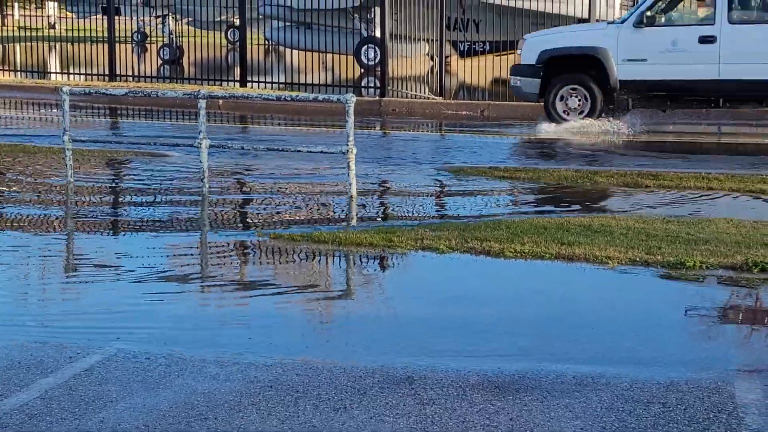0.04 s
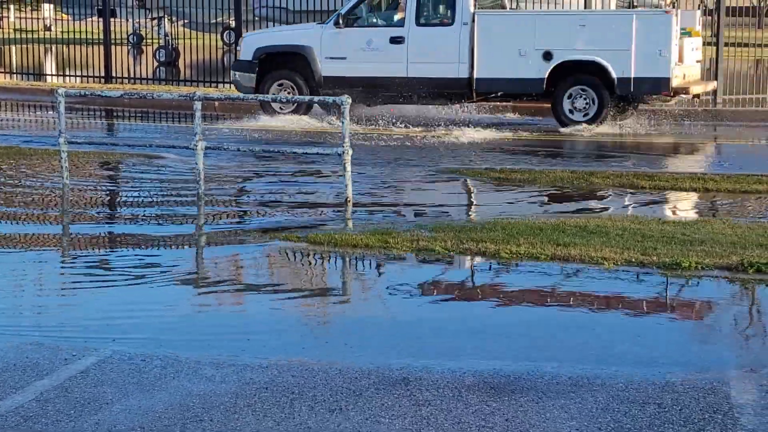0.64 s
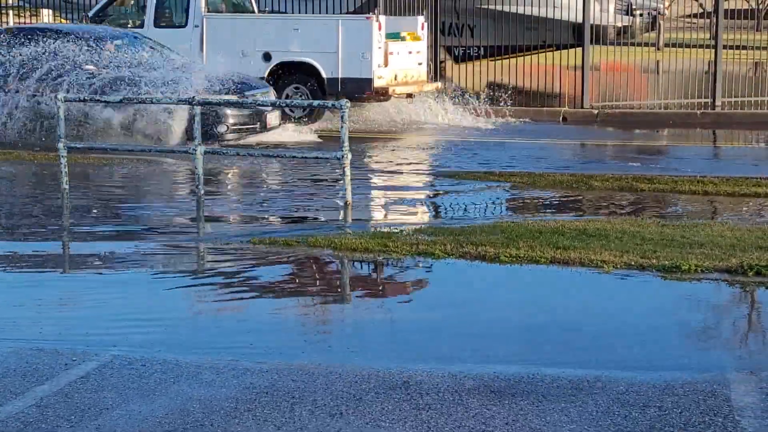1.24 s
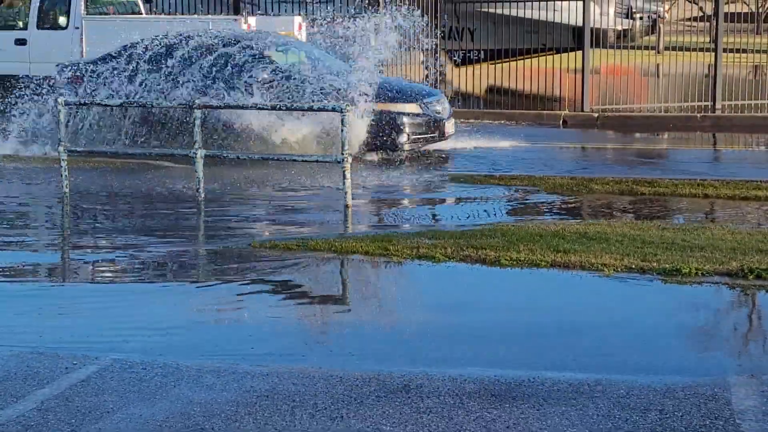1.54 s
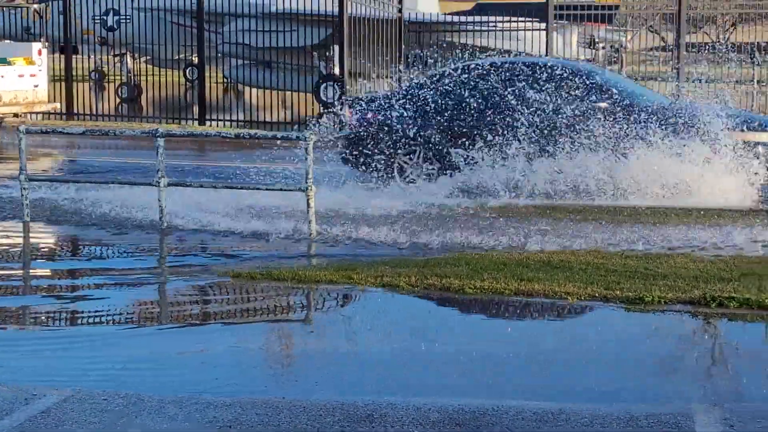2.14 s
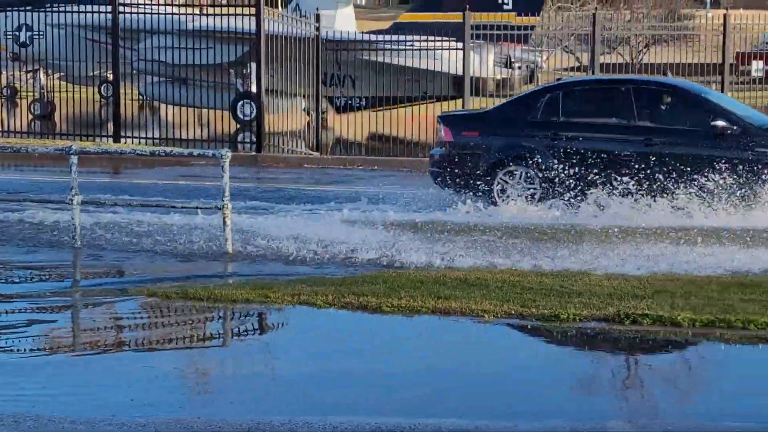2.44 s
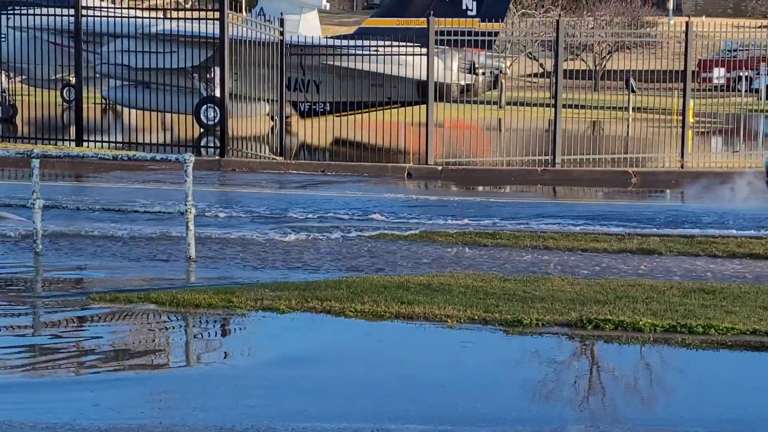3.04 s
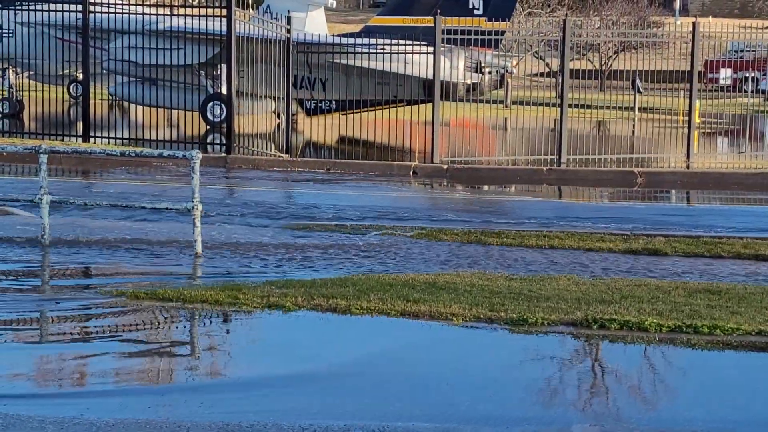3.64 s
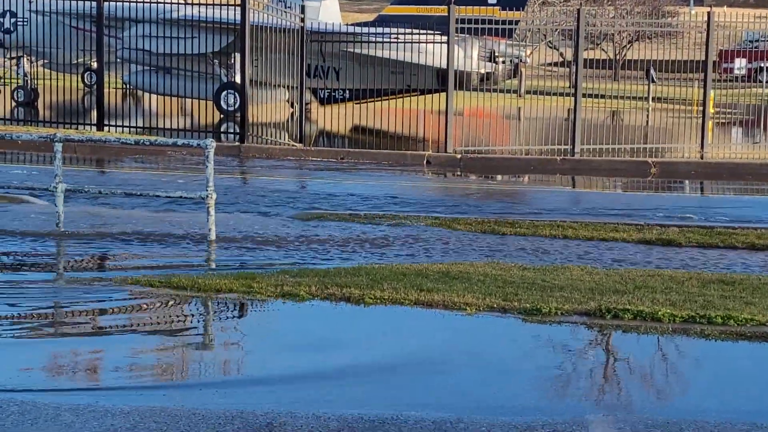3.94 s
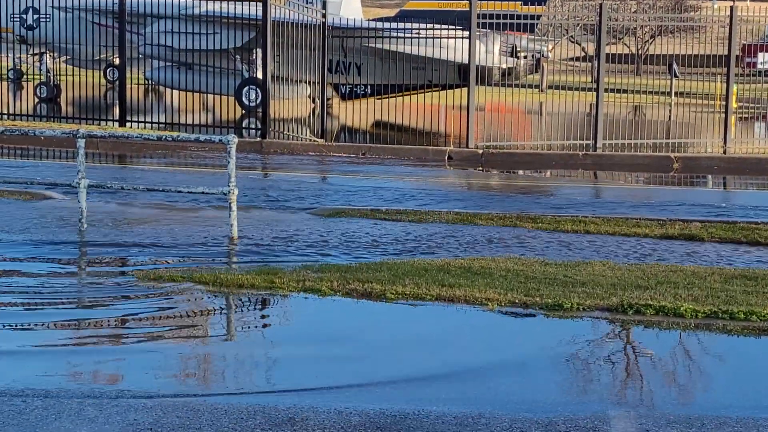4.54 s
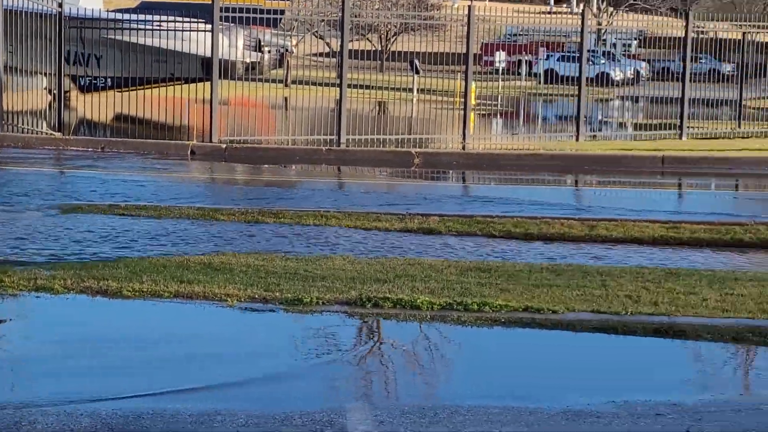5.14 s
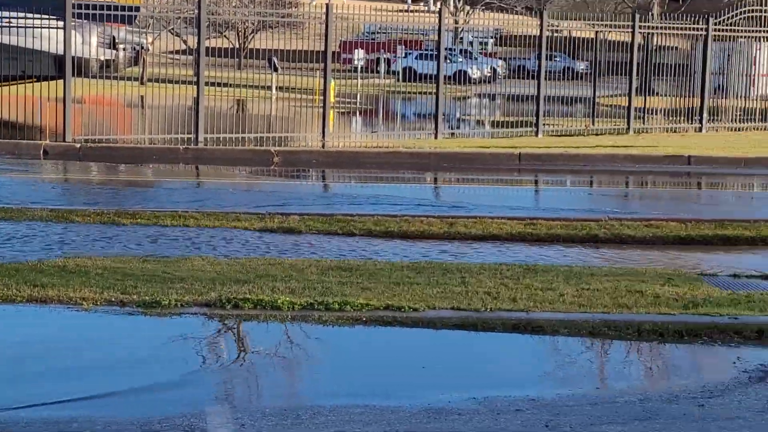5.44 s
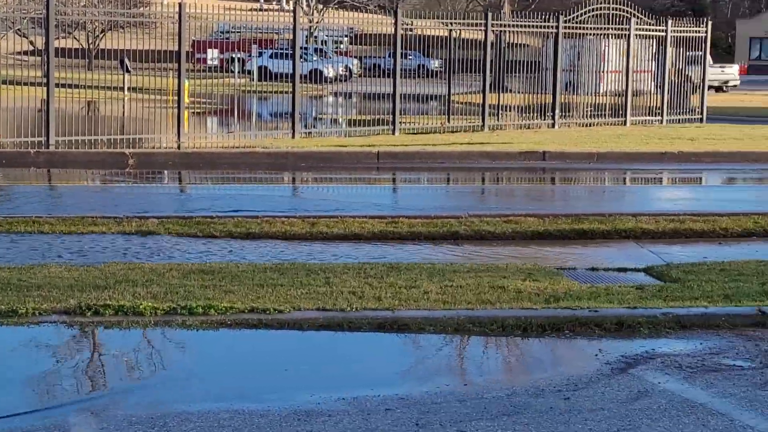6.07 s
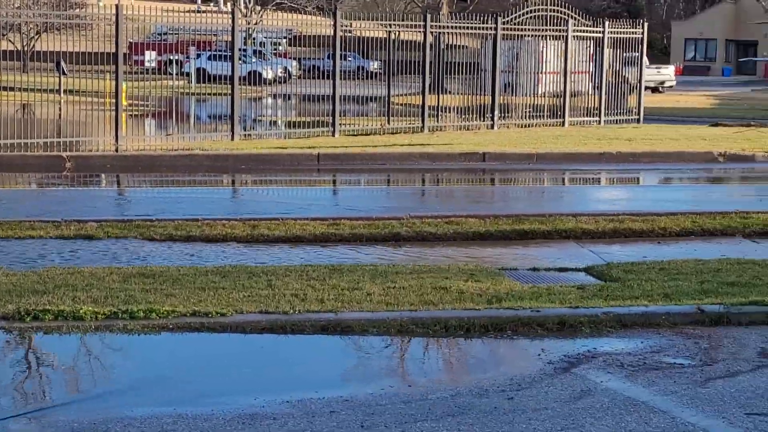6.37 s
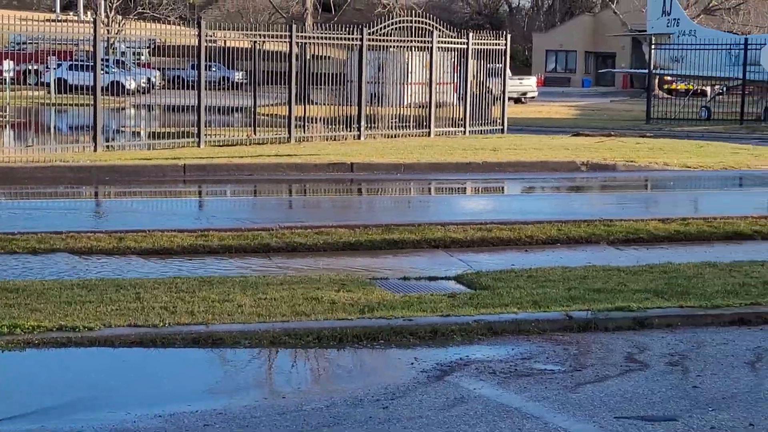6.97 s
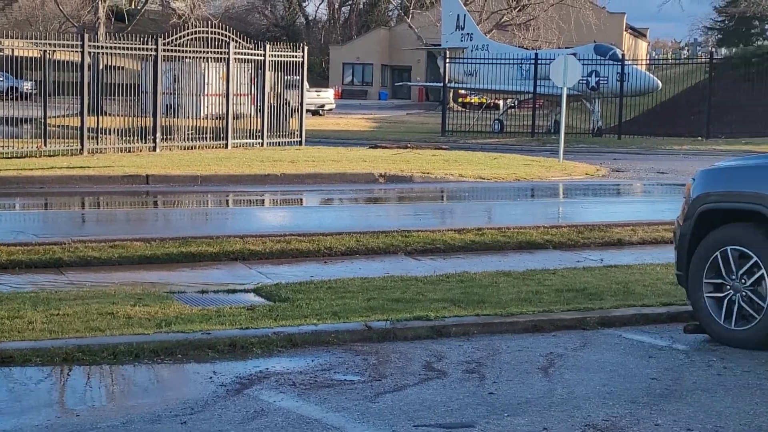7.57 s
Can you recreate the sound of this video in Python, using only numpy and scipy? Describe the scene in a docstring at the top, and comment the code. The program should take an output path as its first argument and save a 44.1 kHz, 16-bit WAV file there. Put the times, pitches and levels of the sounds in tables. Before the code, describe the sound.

A pickup's exhaust drones steadily as its tyres churn and hiss through a flooded street a few metres off. The splashing swells when a car ploughs through too, throwing spray that patters back down. Around halfway the engine note winds down, with a brief thin squeal from wet wheels. What remains is quieter open air: gently gurgling water, low puffs of far traffic and a few thin bird chirps.

```python
"""Driving through floodwater

A pickup and a car plough through standing water some metres away. The pickup's exhaust pulses drone
and wind down; tyres churn the flood and hiss, bow waves break, spray swells and rains back, and the
car's wet wheels squeal thinly. Then the wake bubbles on, distant traffic rumbles in uneven puffs
and a small bird whistles."""
import sys
import numpy as np
from scipy import signal
from scipy.fft import rfft, irfft, next_fast_len
from scipy.io import wavfile

SR = 44100
rng = np.random.default_rng(int(sys.argv[2]) if len(sys.argv) > 2 else 0)


def put_to_file(sound):
    """Save the sound as 16-bit audio at rate SR, in the file named by the first command-line argument."""
    columns = np.atleast_2d(sound).T  # one column per channel
    safe = np.clip(columns, -1, 1)
    whole_steps = np.round(safe * 32767)
    wavfile.write(sys.argv[1], SR, whole_steps.astype(np.int16))


N = 344224
TIME = np.arange(N) / SR  # seconds
BIN_HZ = np.maximum(np.fft.rfftfreq(N, 1 / SR), 1)


def undb(db):
    """Decibels to gain."""
    return 10 ** (np.asarray(db) / 20)


def unit(x):
    """Scale to rms 1."""
    return x / np.sqrt(np.mean(x ** 2))


def curves(table):
    """One curve per column after the first, joined by straight lines in time."""
    times_s, *columns = np.transpose(table)
    return [np.interp(TIME, times_s, column) for column in columns]


def swell(from_s, until_s, rise_db_per_s, fall_db_per_s):
    """Attack, hold and release, in dB relative to the held level."""
    return -rise_db_per_s * np.maximum(from_s - TIME, 0) - fall_db_per_s * np.maximum(TIME - until_s, 0)


def bump(at_s, half_s):
    """A bell-shaped rise from 0 to 1 and back."""
    return np.exp(-((TIME - at_s) / half_s) ** 2)


def turns(hz):
    """Running phase of a frequency curve, in radians."""
    return 2 * np.pi * np.cumsum(hz) / SR


def across(points):
    """Join (freq_hz, value) points on a log-frequency axis."""
    hz, value = np.transpose(points)
    return np.interp(np.log(BIN_HZ), np.log(hz), value)


def colour(points):
    """EQ gain through (freq_hz, gain_db) points, falling steeply beyond both ends."""
    skirts = np.minimum(BIN_HZ / points[0][0], 1) * np.minimum(points[-1][0] / BIN_HZ, 1)
    return undb(across(points)) * skirts ** 6


def walk(rate_hz):
    """Smooth random wander of spread 1, changing about rate_hz times a second."""
    size = next_fast_len(N)
    hz = np.fft.rfftfreq(size, 1 / SR)
    smoothing = np.exp(-(hz / rate_hz) ** 2 / 2)
    return unit(irfft(rfft(rng.standard_normal(size)) * smoothing, size)[:N])


def noise():
    """Three unrelated white noises: common, left, right."""
    return rng.standard_normal((3, N))


def wet_noise(drops_per_s, spread_db, drop_gain):
    """Three-part noise peppered with droplet impacts: many small, a few large."""
    parts = noise()
    for part in parts:
        size = undb(spread_db * np.minimum(rng.exponential(size=N), 5))
        hits = rng.random(N) < drops_per_s / SR
        part += drop_gain * unit(hits * size * rng.standard_normal(N))
    return parts


def band(hz, width_hz):
    """Three-part noise ringing in one moving resonance."""
    count = int(8 * width_hz * N / SR)
    offset_hz = np.fft.fftfreq(count, N / SR / count)
    phases = 2 * np.pi * rng.random((count, 3)).T
    envelopes = np.fft.ifft(np.exp(1j * phases - (offset_hz / width_hz) ** 2 / 2))
    coarse_s = np.linspace(0, N / SR, count)
    carrier = np.exp(1j * turns(hz))
    return np.array([unit(np.real(np.interp(TIME, coarse_s, env) * carrier)) for env in envelopes])


def stereo(parts, eq, lag_ms, above_hz):
    """Three parts to stereo at rms 1: the common one lags on the right above the bass, the rest is diffuse."""
    # likeness of left and right: freq_hz, coherence (0-1)
    likeness = [(60, 0.55), (300, 0.81), (900, 1), (3000, 0.43), (5000, 0.19), (10000, 0.26), (15000, 0.3)]
    common, *diffuse = rfft(parts)
    share = np.clip(across(likeness), 0, 1)
    delay = np.exp(-2j * np.pi * np.maximum(BIN_HZ - above_hz, 0) * lag_ms / 1000)
    pair = np.sqrt(share) * np.array([common, common * delay]) + np.sqrt(1 - share) * np.array(diffuse)
    return unit(irfft(pair * eq, N))


def traffic(level_db=-48):
    """A bed of far tyres on wet roads, off to the left."""
    # tone of the wash: freq_hz, gain_db
    wash_eq = [(300, 9.5), (550, 1), (850, 3.5), (1500, -5), (2000, -5.5), (2500, -3), (3000, -5.5),
               (4000, -10.5), (6000, -13), (7500, -18.5), (8800, -25.5), (11000, -29), (13300, -50),
               (16000, -46)]
    wash = stereo(noise(), colour(wash_eq), lag_ms=0.529, above_hz=72)
    return wash * undb(level_db + 1.54 * walk(17))


def high_hiss(peak_s=5.6, centre_hz=12600, sink_hz_per_s=600):
    """A faint, very high hiss on the left that slowly sinks in pitch and fades."""
    hz = centre_hz - sink_hz_per_s * (TIME - peak_s)
    hiss = stereo(band(hz, width_hz=1150), 1, lag_ms=0.625, above_hz=600)
    level_db = -65.5 + swell(peak_s, peak_s, rise_db_per_s=20, fall_db_per_s=2)
    pan_left = undb([[2], [-9]])
    return hiss * undb(level_db) * pan_left


def bird(rasp_hz=70, rasp_db=2.2, pip_s=0.007, pip_fall_hz=550):
    """A small bird: thin, raspy gliding whistles and quick falling pips."""
    # whistles: start_s, length_s, first_hz, middle_hz, last_hz, level_db
    whistles = [(4.494, 0.021, 7100, 7750, 7350, -49), (4.516, .014, 7400, 7200, 7050, -58),
                (4.572, .022, 7480, 7600, 7750, -56), (4.595, .055, 7800, 8100, 7900, -61),
                (4.68, .06, 7950, 7900, 7800, -61), (4.743, .012, 7800, 7700, 7600, -58),
                (4.775, .03, 7700, 7760, 7740, -55), (5.133, 0.02, 6950, 7750, 7250, -48.5),
                (5.156, 0.06, 7200, 7330, 7480, -61.5), (5.215, 0.042, 7520, 7720, 7850, -53),
                (5.258, 0.032, 7950, 8120, 8080, -60), (5.29, .048, 7980, 7950, 8020, -58.5),
                (5.345, 0.08, 8200, 8200, 8000, -62), (5.425, .043, 7950, 7920, 7800, -64),
                (6.478, 0.06, 8600, 8150, 7750, -58)]
    # pips: centre_s, pitch_hz, level_db
    pips = [(4.611, 7060, -58), (4.674, 6850, -58), (4.707, 6900, -56), (4.738, 6900, -56.5),
            (4.772, 6850, -56), (4.807, 6850, -55), (5.823, 6950, -58), (5.852, 6950, -52),
            (5.879, 6850, -45), (5.908, 6600, -50), (5.937, 6250, -54), (5.968, 5980, -50)]
    song = np.zeros(N)
    jitter_hz, flicker = rasp_hz * walk(200), undb(rasp_db * walk(130))
    for start_s, length_s, *pitches_hz, db in whistles:
        progress = np.linspace(0, 1, int(length_s * SR))
        at = int(start_s * SR) + np.arange(len(progress))
        glide_hz = np.polyval(np.polyfit([0, .5, 1], pitches_hz, 2), progress)
        envelope = np.sqrt(2 * np.abs(np.sin(np.pi * progress)))
        song[at] += undb(db) * flicker[at] * envelope * np.sin(turns(glide_hz + jitter_hz[at]))
    for centre_s, hz, db in pips:
        progress = np.linspace(-.5, .5, int(pip_s * SR))
        at = int((centre_s - pip_s / 2) * SR) + np.arange(len(progress))
        envelope = np.sqrt(2) * np.cos(np.pi * progress)
        song[at] += undb(db) * envelope * np.sin(turns(hz - pip_fall_hz * progress))
    return np.array([song, np.roll(song, 6)])  # slightly later on the right


def tick(decay_s=0.0019, trim_db=-5):
    """A tiny bright tick close by."""
    # the tick: start_s, level_db
    hits = [(7.5697, -45)]
    burst = stereo(noise(), colour([(7000, -8), (12500, 3), (15000, -9)]), lag_ms=0.1, above_hz=720)
    return burst * sum((TIME > s) * np.exp(-np.abs(TIME - s) / decay_s) * undb(db + trim_db)
                       for s, db in hits)


def rumble(road_trim_db=-2, puff_trim_db=-1, puff_roar_db=-7, far_from_s=4.4, flutter_db=1.4):
    """Road noise and a second engine's note: a steady roar while close, separate puffs from far away."""
    # low roar of tyres and engines: time_s, level_db
    roar_levels = [(0, -29), (.7, -31.5), (1.5, -29), (2.3, -29.5), (3, -31), (4.2, -31), (4.5, -33.5),
                   (5.3, -33.5), (5.7, -32.5), (6.15, -34.5), (7.3, -34), (7.6, -34.5)]
    # tone of the roar: freq_hz, gain_db
    roar_eq = [(15, -18), (28, -24), (48, 1), (85, -0.5), (120, -3), (150, -3.5), (195, -9.5), (245, -8),
               (310, -12.5), (420, -21), (600, -32)]
    # the second engine: time_s, firing_hz, level_db
    engine = [(0, 127.4, -49), (.8, 129, -44), (1.3, 131.3, -46), (3.4, 130.8, -52), (4.28, 116, -48),
              (4.5, 117, -38), (4.7, 104.3, -38), (4.9, 97.6, -40), (5.02, 116.3, -38), (5.15, 123, -50),
              (6.4, 120.6, -46.5), (7.8, 111.4, -46)]
    # puffs of far rumble: centre_s, half_length_s, pitch_hz, level_db
    puffs = [(4.297, 0.029, 118, -28.5), (4.38, 0.028, 80.2, -31.5), (4.474, 0.038, 117.5, -34),
             (4.577, 0.022, 72.4, -29), (4.649, 0.029, 109, -31.5), (4.705, .018, 100.2, -33),
             (4.854, .049, 126.5, -36), (4.954, 0.022, 110, -35.5), (5.032, .03, 117, -32),
             (5.105, .022, 124, -35), (5.224, 0.021, 70.3, -31), (5.345, .022, 119.3, -33),
             (5.479, 0.04, 122, -30), (5.678, 0.049, 122, -31), (5.828, .03, 68.45, -34),
             (5.935, .04, 119.6, -32), (6.161, .029, 124.2, -30), (6.39, .033, 121, -29.5),
             (6.491, .035, 119, -34.5), (6.61, 0.048, 116.6, -33), (6.695, 0.036, 117.2, -30.5),
             (6.802, .027, 114.8, -37), (6.907, 0.018, 120.3, -32.5), (6.976, .02, 116, -37),
             (7.069, 0.027, 120.8, -29.5), (7.147, 0.022, 114, -32), (7.246, 0.027, 116, -31.5),
             (7.287, .02, 62, -35), (7.336, 0.027, 113, -32), (7.447, 0.02, 122, -36.5),
             (7.718, 0.032, 91.9, -37.5)]
    road_db, = curves(roar_levels)
    firing_hz, engine_db = curves(engine)
    waver = 0.62 * walk(10.8)  # radians
    note = undb(engine_db) * np.cos(turns(firing_hz) + waver)
    puffing = 0
    for centre_s, half_s, hz, db in puffs:
        puff = undb(db + puff_trim_db) * bump(centre_s, half_s)
        note += puff * np.cos(2 * np.pi * hz * TIME + waver)
        puffing += puff
    far = undb(swell(far_from_s, N / SR, 59.9, 0))  # fades the flutter in
    road = stereo(noise(), colour(roar_eq), lag_ms=0.79, above_hz=320)
    road *= undb(road_db + road_trim_db + flutter_db * far * walk(21))
    puff_roar = stereo(noise(), colour(roar_eq), lag_ms=0.79, above_hz=320)
    return road + puff_roar * puffing * undb(puff_roar_db) + np.sqrt(2) * note


def gurgles(count=800, low_hz=1456, high_hz=2980, cycles=12, glide=0.039, spread_db=12, lag_s=0.00048):
    """The wake slops on: small bubbles ring briefly and rise in pitch."""
    bubbles = np.zeros(N + SR)
    for when, pitch, size in rng.random((count, 3)):
        hz = low_hz * (high_hz / low_hz) ** pitch
        age = np.arange(0, 2 * np.pi, hz / (cycles * SR))  # in decay times
        at = int(when * N) + np.arange(len(age))
        ring = np.sin(2 * np.pi * cycles * age * (1 + glide * age / 2))
        bubbles[at] += undb(spread_db * size) * np.sqrt(age) * np.exp(-age) * ring
    level_db = -60 + swell(from_s=4.7, until_s=5.2, rise_db_per_s=8, fall_db_per_s=1.7)
    slop = unit(bubbles[:N]) * undb(level_db)
    return np.array([slop, np.interp(TIME - lag_s, TIME, slop)])


def squeal(pitch_hz=2570, upper_ratio=1.39, waver_hz=7):
    """The car's wet wheels ring roughly in two modes, the upper fading first, and catch in pure tones."""
    # pure catches: centre_s, half_length_s, pitch_hz, level_db
    flares = [(3.52, .025, 2530, -51), (3.6, .022, 2560, -45), (3.65, .02, 2500, -49),
              (3.77, .035, 2490, -48), (3.79, .035, 3470, -50), (3.865, .022, 2510, -44.5),
              (3.88, .035, 3530, -50), (3.92, .02, 2690, -48), (3.962, .018, 2565, -38.5),
              (3.997, .018, 2555, -44.5), (4.055, .016, 2590, -49), (4.1, .015, 2540, -50),
              (4.13, .016, 2500, -47), (4.16, .012, 2580, -48)]
    level_db = -51 + swell(from_s=3.6, until_s=4.15, rise_db_per_s=45, fall_db_per_s=26)
    upper_db = -1.5 + swell(from_s=3.55, until_s=3.85, rise_db_per_s=8, fall_db_per_s=10)
    ring_hz = pitch_hz + 25 * walk(12)
    modes = band(ring_hz, width_hz=175) + undb(upper_db) * band(upper_ratio * ring_hz, width_hz=170)
    modes[0] *= 1.7  # more of the common part tightens the image
    rough = stereo(modes, 1, lag_ms=0.7, above_hz=920) * undb(level_db)
    waver = waver_hz * walk(37)
    pure = sum(undb(db) * bump(s, half_s) * np.sin(turns(hz + waver)) for s, half_s, hz, db in flares)
    return rough + np.sqrt(2) * np.array([pure, np.roll(pure, 18)])


def tyre_hiss(flutter_db=1.3):
    """Water squeezed through the treads hisses in fluttering bands that swell, glide and fade."""
    # treads, wheel jets and sizzling spray of the pickup, then the car, then far tyres:
    # full_from_s, until_s, rise_db_per_s, fall_db_per_s, centre_hz, glide_hz_per_s, width_hz, level_db
    hisses = [(0, 1.3, 10, 8, 1840, 10, 280, -52.5), (0, 1.9, 10, 14, 4790, -50, 290, -52.5),
              (.72, 1.2, 42, 9, 3100, -35, 110, -49.5), (.45, 2.4, 60, 35, 9550, 150, 300, -60),
              (.47, 2.6, 60, 60, 11000, 40, 330, -59), (1.7, 2.6, 6, 60, 12450, 150, 480, -56),
              (3.4, 3.6, 35, 16, 11050, -500, 300, -61), (3.55, 3.9, 25, 25, 10200, -500, 260, -64),
              (2.55, 2.6, 40, 13, 2040, 280, 280, -45), (2.45, 2.55, 12, 26, 4650, -50, 290, -49),
              (2.5, 2.58, 15, 45, 7250, -60, 400, -46.5), (3.1, 3.4, 16, 18, 7280, 250, 420, -54),
              (3.5, 4.1, 8, 22, 2430, 180, 280, -50), (3.3, 4.2, 14, 45, 14900, 0, 600, -64),
              (4.3, 5.5, 20, 1.5, 3570, 0, 200, -61.5), (5.05, 5.5, 14, 12, 1450, 0, 260, -57.5),
              (5.1, 5.3, 12, 15, 2450, -90, 280, -54), (7.55, 7.8, 7, 10, 2270, 0, 320, -53),
              (7.45, 7.65, 40, 20, 3900, 0, 400, -62), (7.45, 7.55, 100, 18, 5850, 0, 450, -58.5),
              (7.52, 7.63, 30, 25, 11600, 0, 900, -64)]
    mix = 0
    for from_s, until_s, rise, fall, hz, glide, width_hz, db in hisses:
        hiss = stereo(band(hz + glide * (TIME - from_s), width_hz), 1, lag_ms=0.595, above_hz=570)
        mix += hiss * undb(db + swell(from_s, until_s, rise, fall) + flutter_db * walk(14))
    return mix


def bow_waves(width_hz=135):
    """Water shoved aside by the wheels breaks in hollow roars, each at its own pitch."""
    # breaking waves, the pickup's and then the car's: centre_s, half_length_s, pitch_hz, level_db
    waves = [(.8, .05, 802, -49), (0.999, .08, 930, -45.5), (1.321, .12, 857, -46.5),
             (1.798, .06, 801, -46), (2.04, 0.056, 831, -40), (2.13, 0.052, 898, -48),
             (2.257, 0.048, 931, -41), (2.409, 0.047, 881, -43), (2.501, .05, 830, -45)]
    pitch_hz, = curves([(s, hz) for s, _, hz, _ in waves])
    force = sum(undb(db) * bump(s, half_s) for s, half_s, _, db in waves)
    return stereo(band(pitch_hz, width_hz), 1, lag_ms=0.56, above_hz=720) * force


def floodwater(churn_trim_db=4, swish_trim_db=3.5, spray_trim_db=5.5):
    """Tyres churn the flood; sheets of water swish out and break into a rain of droplets."""
    # water under the tyres: time_s, churn_db, swish_db
    water_levels = [(0.03, -47, -48), (0.11, -43.5, -47), (0.24, -46, -50), (0.74, -43, -46.5),
                    (1.71, -43, -49.5), (2.1, -40, -45), (2.6, -42, -44.5), (2.77, -46, -48.5),
                    (3.18, -47, -49), (3.85, -52.5, -49), (4.67, -55, -57), (5.73, -55.5, -54),
                    (6.42, -59, -59), (7.78, -55.5, -55.5)]
    # airborne spray: time_s, level_db
    spray_levels = [(0.06, -60), (0.38, -60), (0.46, -56), (1.5, -55.5), (1.99, -48), (2.4, -47),
                    (2.65, -46), (2.77, -57), (4.25, -58.5), (4.35, -63), (4.6, -67.5)]
    # spurts of spray slapping back: centre_s, half_length_s, boost_db
    spurts = [(.78, .04, 2), (3.905, .012, 4), (3.975, .014, 3), (4.2, .02, 3), (4.26, .015, 3)]
    # pan of the churn as the car crosses in front: time_s, right_share (0-1)
    crossing = [(2.35, 0), (2.75, .8), (4.2, .7), (4.8, .1)]
    # tone of each layer: freq_hz, gain_db
    churn_eq = [(240, 7.5), (400, -3), (500, -12), (650, -4), (827, -2.5), (1130, -4.5), (1430, -10.5),
                (1700, -10.5), (2210, -53), (3740, -120)]
    swish_eq = [(820, -19), (1400, 2.5), (2200, -2.5), (2480, 6), (2780, -0.5), (3090, 3), (4180, -2.5),
                (4720, -3.5), (6050, -9), (7250, -7.5), (8500, -24.5), (11000, -23), (18700, -120)]
    spray_eq = [(3000, -42), (5000, -3), (7000, -1), (8200, -6), (9000, -8), (10500, -4.5), (12600, -2.5),
                (14200, -6.5), (15800, -7)]
    churn_db, swish_db = curves(water_levels)
    right_share, = curves(crossing)
    spray_db, = curves(spray_levels)
    spray_db += swell(from_s=0, until_s=5.8, rise_db_per_s=0, fall_db_per_s=12)
    spray_db += sum(db * bump(s, half_s) for s, half_s, db in spurts)
    surge = walk(31)  # the bow wave breaks unevenly
    splashes = wet_noise(drops_per_s=2500, spread_db=4.5, drop_gain=0.37)
    droplets = wet_noise(drops_per_s=3000, spread_db=3.8, drop_gain=0.8)
    bubbles = [wet_noise(drops_per_s=900, spread_db=2.5, drop_gain=0.53) for _ in range(2)]
    from_left = stereo(bubbles[0], colour(churn_eq), lag_ms=0.73, above_hz=827)
    from_right = stereo(bubbles[1], colour(churn_eq), lag_ms=0.54, above_hz=630)[::-1]
    churn = np.sqrt(1 - right_share) * from_left + np.sqrt(right_share) * from_right
    swish = stereo(splashes, colour(swish_eq), lag_ms=0.677, above_hz=800)
    spray = stereo(droplets, colour(spray_eq), lag_ms=0.675, above_hz=1060)
    return (churn * undb(churn_db + churn_trim_db + walk(12))
            + swish * undb(swish_db + swish_trim_db + 1.4 * surge)
            + spray * undb(spray_db + spray_trim_db + 0.85 * surge))


def exhaust(lag_s=0.00032, throb_db=0.77, flutter_db=1.1, waver_rad=0.42):
    """The pickup's exhaust pulses drone in two clean low harmonics, with a lope and wavering overtones."""
    # the drone: time_s, pulse_hz, fundamental_db, octave_db
    drone = [(.03, 71.2, -19.3, -23.5), (.17, 71.9, -19.7, -25), (.35, 72.7, -21.2, -21.5),
             (.52, 73.1, -20.5, -19), (.72, 73.5, -20.7, -21.5), (.87, 73.9, -22.3, -27),
             (.98, 74.4, -22.5, -40), (1.09, 74.8, -19.7, -30.5), (1.18, 75.1, -22, -45),
             (1.27, 75.2, -22, -29), (1.38, 75.4, -19.8, -29), (1.55, 75.6, -26.5, -26.5),
             (1.72, 75.9, -21.7, -24.7), (1.88, 76.2, -25, -22.7), (2.01, 76.5, -29.5, -23.3),
             (2.19, 76.8, -22.8, -24), (2.38, 76.5, -28.5, -25), (2.52, 75.7, -24, -26),
             (2.72, 73.6, -25.3, -25), (2.86, 72.6, -28, -26.5), (3.21, 72.2, -32, -30),
             (3.37, 72, -24, -28.5), (3.52, 69, -27, -22), (3.62, 66, -27, -19.7), (3.77, 63.5, -32, -18.7),
             (3.87, 62, -29, -20.3), (3.99, 60.6, -31.5, -27.5), (4.21, 58, -31, -27.5)]
    # upper harmonics: time_s, third_db, fourth_db, fifth_db
    harmonics = [(0, -28.5, -29, -41), (.1, -29, -29, -37), (.2, -33, -38, -43), (.35, -38, -47, -35),
                 (.52, -29.8, -40, -43), (.78, -32, -32.7, -40), (.91, -52, -36, -44),
                 (1.08, -33, -38, -43), (1.29, -32, -43, -54), (1.55, -31, -37, -49),
                 (1.68, -35, -37.5, -50), (1.77, -44, -47, -50), (1.89, -31.5, -44, -44.5),
                 (2.03, -29.5, -40, -49), (2.24, -37, -35, -48), (2.38, -32.5, -37, -50),
                 (2.62, -41, -42, -53), (3.44, -43, -44.5, -49), (3.66, -54, -36, -46),
                 (3.78, -54, -37, -42.5), (3.88, -54, -42, -44), (3.98, -54, -33.5, -46),
                 (4.2, -55, -40, -49)]
    # faint overtones: pulse_multiple, level_db (relative to the fifth harmonic)
    overtones = [(3.5, -8), (6, -11), (7, -13)]
    pulse_hz, *low_db = curves(drone)
    upper_db = curves(harmonics)
    right_lag = 2 * np.pi * pulse_hz * lag_s * np.array([[0], [1]])
    phase = turns(pulse_hz) - right_lag + 0.027 * walk(35)

    def smeared(k):
        """Phase of harmonic k: the pipe smears each pulse, so higher ones come out later."""
        return k * phase - k ** 2 * np.pi / 12

    note = sum(undb(db + throb_db * walk(1.2)) * np.cos(smeared(k)) for k, db in enumerate(low_db, 1))
    # uneven firing adds a loping tone between the fundamental and the octave
    lope_db = -35 - 0.7 * TIME + walk(3)
    lope_db += swell(from_s=0, until_s=3.8, rise_db_per_s=0, fall_db_per_s=60)
    partials = [(1.5, lope_db), *enumerate(upper_db, 3)]
    partials += [(k, upper_db[-1] + db) for k, db in overtones]
    for k, db in partials:
        note += undb(db + flutter_db * walk(2.6)) * np.cos(smeared(k) + waver_rad * walk(0.6))
    release = undb(swell(from_s=0, until_s=4.22, rise_db_per_s=0, fall_db_per_s=220))
    return np.sqrt(2) * note * release


def scene():
    """Engines and water on two buses that dip briefly, with the bird and the tick on top."""
    # brief dips in level: centre_s, half_length_s, bass_db, treble_db
    lulls = [(2.612, 0.022, -15, -1.5), (4.529, .016, -8, 0), (5.175, 0.031, -8, 0),
             (5.275, 0.022, -12, -1.5), (5.385, .018, -9, 0), (5.565, 0.016, -7, 0),
             (6.284, 0.046, -16, -4.5), (6.44, .014, -9, 0), (6.946, 0.021, -9, -1.5), (7.205, .014, -6, 0)]
    bass_dip_db = sum(db * bump(s, half_s) for s, half_s, db, _ in lulls)
    treble_dip_db = sum(db * bump(s, half_s) for s, half_s, _, db in lulls)
    bass = exhaust() + rumble()
    treble = floodwater() + bow_waves() + gurgles() + tyre_hiss() + high_hiss() + squeal() + traffic()
    return bass * undb(bass_dip_db) + treble * undb(treble_dip_db) + bird() + tick()


def record(dry, top_hz=15800):
    """Each side is coloured a little differently, and a steep low-pass cuts the top."""
    # stereo balance: freq_hz, left_minus_right_db
    balance = [(100, 0.35), (280, -1.6), (600, 0.5), (3000, -0.8), (6500, 1.5), (8000, -3), (9500, 0),
               (13500, 5), (15500, 2)]
    side_eq = undb(np.array([[.5], [-.5]]) * across(balance))
    coloured = irfft(rfft(dry) * side_eq, N)
    return signal.sosfilt(signal.ellip(10, .2, 80, top_hz, fs=SR, output="sos"), coloured)


dry = scene()
out = record(dry)
put_to_file(out)
```